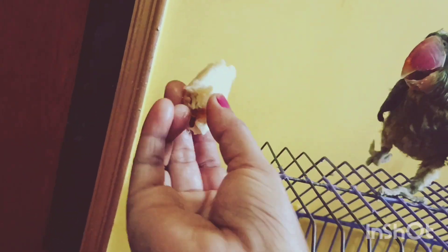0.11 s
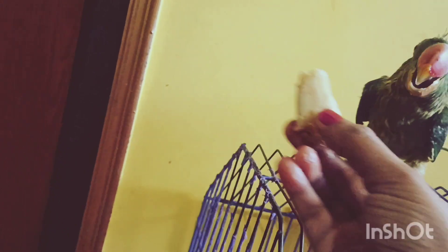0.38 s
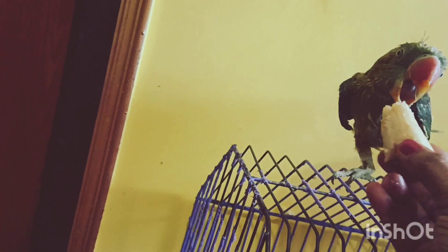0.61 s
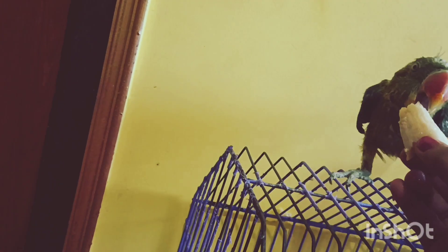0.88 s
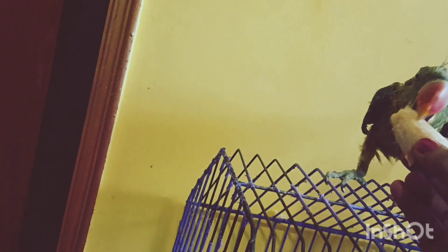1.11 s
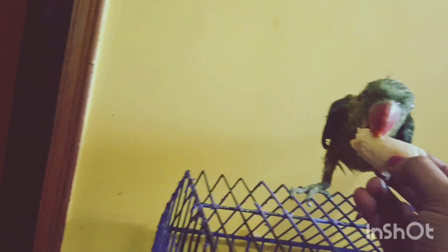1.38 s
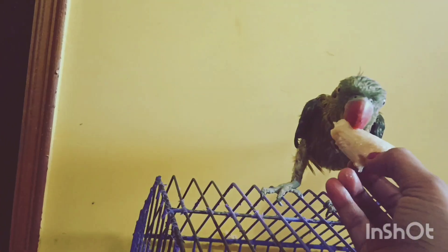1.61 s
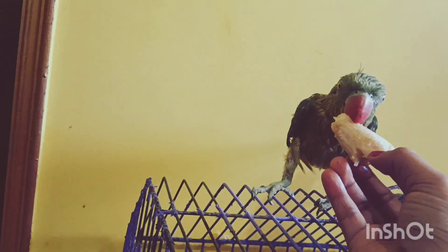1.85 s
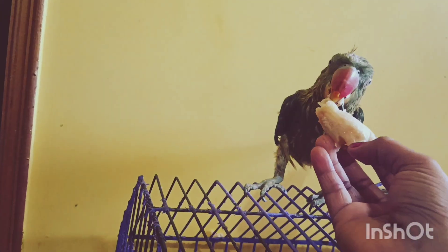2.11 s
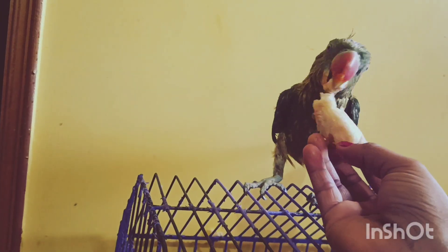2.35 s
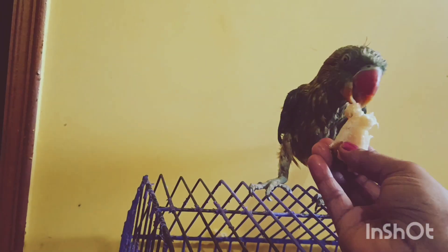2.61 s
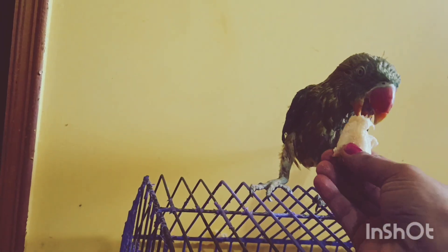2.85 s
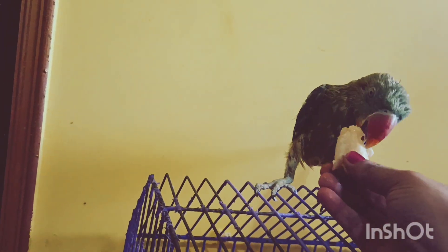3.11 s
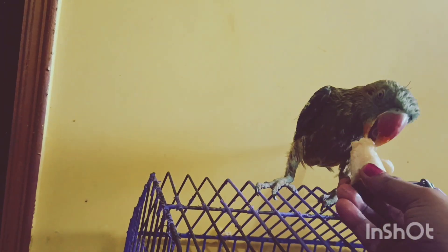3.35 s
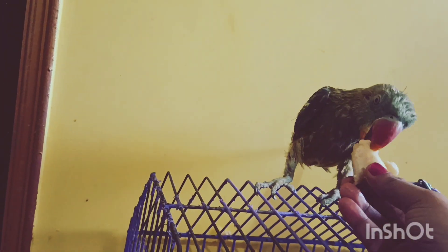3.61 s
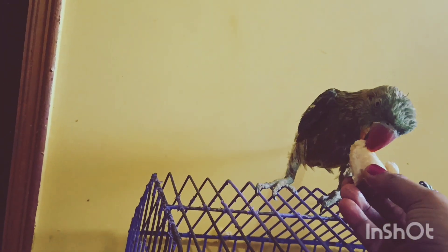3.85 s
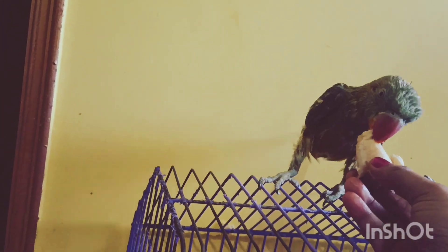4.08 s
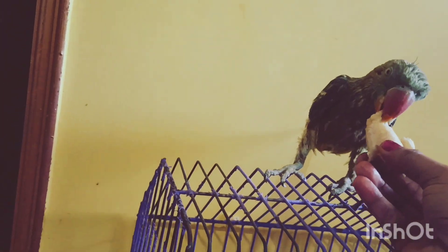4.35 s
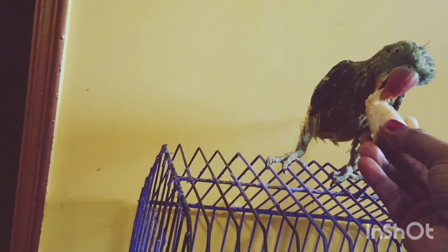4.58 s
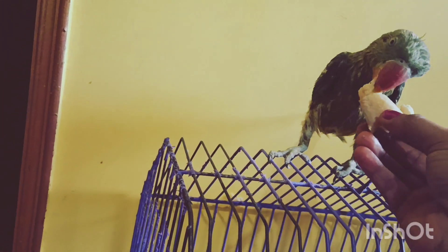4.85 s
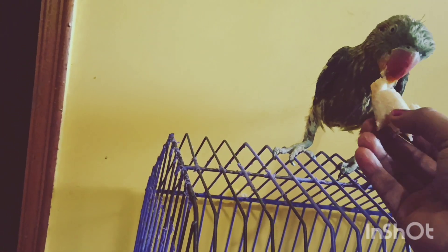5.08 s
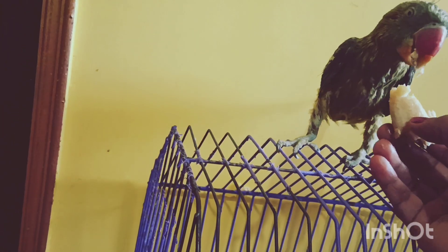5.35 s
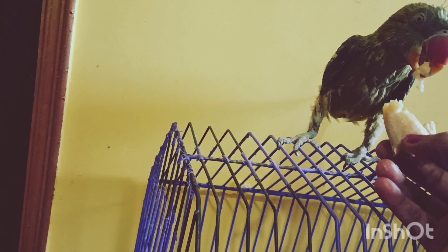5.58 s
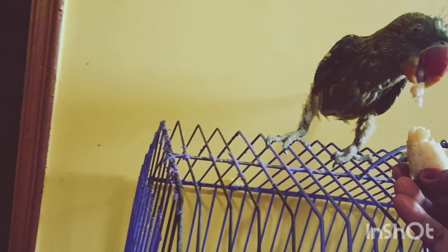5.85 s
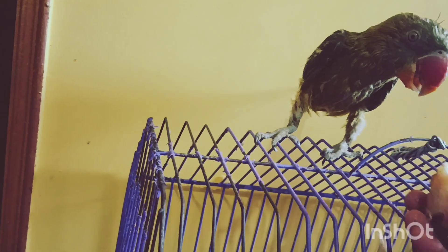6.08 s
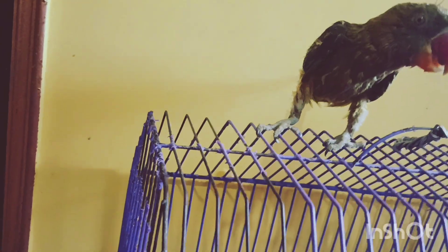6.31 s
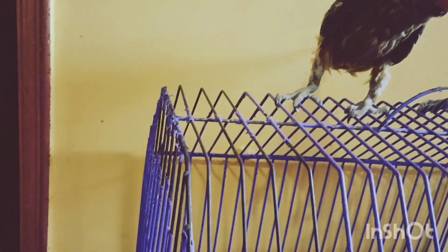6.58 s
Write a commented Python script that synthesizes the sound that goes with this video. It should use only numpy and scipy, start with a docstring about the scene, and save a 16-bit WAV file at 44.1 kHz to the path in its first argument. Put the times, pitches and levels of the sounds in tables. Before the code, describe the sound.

Close, piercing parrot screeches burst out in quick succession, with a brief falling rattle and two final shrieks, over quiet household murmur.

```python
"""Young parakeet, hard-walled room

A small room, the bird close to a phone with two microphones: one soft whistle, two runs of loud
screeches and a rattling squawk. The syrinx gives harmonics of a pitch that glides, jumps register and
trills; the throat colours them, and puffs of noise are the air. Echoes and a dense tail make the room.
The loud calls overload the microphone input; shaped noise and faint tones make the quiet household below."""
import sys
import numpy as np
from scipy import signal
from scipy.fft import rfft, irfft
from scipy.io import wavfile
from scipy.ndimage import uniform_filter1d

SR = 44100
rng = np.random.default_rng(int(sys.argv[2]) if len(sys.argv) > 2 else 0)


def decibels_to_gain(level_db):
    """Convert a level in decibels to a linear amplitude gain (20 dB per decade)."""
    exponent = np.asarray(level_db, float) / 20
    return 10 ** exponent


def int16_out(signal):
    """Quantize to a 16-bit WAV file."""
    q = np.round(np.clip(np.atleast_2d(signal).T, -1, 1) * 32767)
    wavfile.write(sys.argv[1], SR, q.astype(np.int16))


N = 295463

# household noise, part common to both microphones: t/s, level/dB
MURMUR = [(0, -61.5), (0.399, -63.5), (.9, -61), (3.45, -58.5), (3.85, -61.5), (4.049, -59.5), (4.6, -60),
          (4.8, -58.5), (5.6, -62), (6.27, -62)]
# its relative spectrum: f/Hz, level/dB
MURMUR_COLOUR = [(18, -48.5), (30, -12), (116, -1), (150, -6), (260, -2), (364, -7), (552, -5),
                 (1300, -11.5), (1440, -9.5), (1730, -12), (7830, -24), (11900, -36), (15000, -56)]
# faint tones from the house, before they waver: from t/s, to t/s, f/Hz, amplitude/dB
TONES = [(3.2, 6.1, 1475, -71), (3.35, 3.8, 975, -71), (1.92, 2.11, 650, -58), (3.5, 3.8, 3800, -73),
         (4.2, 4.45, 5050, -81), (6.08, 6.16, 480, -67), (6.08, 6.25, 1880, -73)]
# the soft whistle, before its flutter: t/s, pitch f/Hz, level/dB
WHISTLE = [(0, 2400, -43), (.03, 2340, -33.5), (.05, 2166, -51), (.075, 2207, -40.5), (.11, 2136, -40),
           (.175, 2119, -33.5), (.21, 2184, -41.5), (.23, 2405, -38.5), (.268, 2846, -58)]
# nearby wall and cage top: left lag/s, right lag/s, level/dB
ECHOES = [(.00042, 0.000096, -12), (.0011, .0014, -16.5), (.0029, 0.0027, -8), (.0074, 0.01, -12.5)]
# time for the room tail to fall 60 dB: f/Hz, time/s
ROOM_T60 = [(500, 0.32), (2100, 0.41), (5500, 0.37), (8500, 0.26), (12000, 0.046)]
# relative strength of the room tail: f/Hz, level/dB
ROOM_COLOUR = [(1000, 3), (2100, 0.5), (3300, -8), (5500, -4), (8500, 4), (12000, -1.5)]
# bird's direct sound at the two microphones: t/s, left minus right level/dB
SIDE_OF_BIRD = [(0, -6), (1, -4), (1.5, -7), (2.2, -0.5), (3.1, -0.5), (4.9, -5.5), (5.3, -2.5), (6.4, -2)]
# puffs of air just ahead of the calls: t/s, level at the crest/dB, length/s
PUFFS = [(0.956, -23.5, 0.026), (1.182, -17, 0.018), (1.448, -20, 0.02), (1.726, -20, 0.035),
         (2.111, -21.5, 0.012), (2.491, -27.5, 0.012), (2.792, -14.5, 0.019), (3.011, -20, 0.019),
         (4.874, -27, 0.011), (5.252, -22.5, 0.021), (6.288, -17.5, 0.035), (6.507, -14.5, 0.034)]
# relative spectrum of the puffs: f/Hz, level/dB
PUFF_COLOUR = [(400, -15), (900, -12.5), (2600, -2), (4000, -4), (7000, -12.5), (10500, -19.5),
               (13000, -47)]
# throat resonance in the screeches: f/Hz, gain/dB
THROAT = [(900, -11.5), (1500, -12), (2200, -5.5), (2900, 3.5), (3400, 6.5), (4000, 5.5), (4600, -5),
          (5300, -2.5), (6200, -6), (7200, -8), (9000, -5.5), (10500, -13.5), (12500, -13), (15000, -44.5)]
# harmonics of the screeches at the source, from the first up: level/dB
HARMONICS_DB = [3, 4, 0, 1, -4.5, -6, -11.5, -9, -7, -9, -12.5, -16]
# uneven vibration of the upper harmonics: from t/s, to t/s, cycles a group, depth (0-1)
UNEVEN = [(5.284, 5.326, 3, 1)]
# one list a screech, low register before any trill: t/s, pitch f/Hz
PITCH = [
    [(.976, 944), (.984, 1536), (.992, 2420), (1.01, 2537), (1.03, 2370), (1.063, 2193), (1.066, 2235),
     (1.098, 1287)],
    [(1.197, 941), (1.208, 2149), (1.225, 2502), (1.245, 2290), (1.27, 2220), (1.285, 2000), (1.3, 1754),
     (1.316, 1107)],
    [(1.464, 950), (1.478, 2326), (1.5, 2288), (1.53, 2115), (1.55, 1912), (1.575, 1705), (1.594, 1207)],
    [(1.743, 923), (1.755, 2209), (1.8, 1971), (1.825, 1742), (1.85, 1591), (1.869, 1153)],
    [(2.136, 1581), (2.168, 2368), (2.198, 2381), (2.239, 2064), (2.285, 1538), (2.295, 1442),
     (2.303, 1151)],
    [(2.511, 1380), (2.538, 2263), (2.552, 1991), (2.56, 2423), (2.604, 2235), (2.651, 1593), (2.676, 1129)],
    [(2.808, 1009), (2.825, 2723), (2.84, 2633), (2.858, 2360), (2.875, 2326), (2.905, 1141)],
    [(3.026, 885), (3.038, 2322), (3.05, 2411), (3.078, 2230), (3.095, 2001), (3.115, 1780), (3.139, 1286)],
    [(4.892, 1524), (4.9, 2515), (4.925, 2596), (4.94, 2258)],
    [(5.273, 1389), (5.285, 2359), (5.305, 2409), (5.328, 2247), (5.35, 2206), (5.38, 2003), (5.405, 1772),
     (5.427, 1346)],
    [(6.318, 1393), (6.327, 2465), (6.338, 2700), (6.36, 2600), (6.378, 2447), (6.391, 2483), (6.402, 2302),
     (6.422, 1415)],
    [(6.532, 1302), (6.542, 2768), (6.552, 2815), (6.586, 2331), (6.597, 2217), (6.612, 1687),
     (6.627, 1335)],
]
# one row a screech: effort at the start, 1/4, 1/2 and 3/4 through (four columns, level/dB),
# extra brightness/dB per octave, extra second harmonic/dB
EFFORT = [(-12.5, -10.5, -5, -6, -0.98, 1.1), (-13, -10.5, -7, -7, -0.33, .6), (-8.5, -9, -10, -8, 0, .6),
          (-7, -9, -4.5, -7.5, 0, 0.3), (-12.5, -1.5, -5.5, -4, 1.1, 3), (-17, -4.5, -4.5, -4.5, 3, 2.97),
          (-6.5, -7, -6, -7, 0.53, 4), (-10.5, -12.5, -8, -7.5, 0.34, 0.56),
          (-27.5, -18.5, -17, -10, -2, .6), (-15.5, -17, -16, -10.5, -1.6, 1.5),
          (-4, -3.5, -2.5, 0.5, 0, 3.9), (-4.5, -5.5, -2, -0.5, 0, 5)]
# flips up to the high register: from t/s, to t/s, pitch ratio, extra brightness/dB per octave
FLIPS = [(0.993, 1.065, 1.338, 1.5), (2.824, 2.857, 1.286, -4.5), (4.904, 4.945, 1.205, -1.5),
         (5.285, 5.328, 1.39, -2), (6.337, 6.391, 1.3, -2), (6.541, 6.586, 1.283, -3)]
# trills, the pitch dropping to a floor and back until the call ends:
# from t/s, period/s, first floor f/Hz, sinking of the floor/Hz per s, lateness of the dip/periods
TRILLS = [(2.192, .0232, 1850, 5246, .08), (2.56, .0229, 1366, 388.3, .02)]
# brightness of the tone at each pitch: pitch f/Hz, extra brightness/dB per octave
PITCH_BRIGHTNESS = [(1000, -3.5), (1500, 2), (1900, 2), (2300, -1.5), (2600, 1), (3300, -3)]
# the voice catches or surges for a moment: mid t/s, half-length/s, level change/dB
CATCHES = [(.991, 0.0075, -6), (1.039, 0.0091, -9.5), (1.273, 0.012, -5), (1.811, 0.012, -5.5),
           (2.151, 0.0034, -4), (2.222, .005, -7.5), (2.544, 0.0086, -7), (2.584, .004, -8),
           (2.824, 0.0039, -9), (2.876, 0.0048, -5), (3.078, .012, -5), (4.9, .006, -11.5),
           (5.286, .005, -7.5), (5.322, .008, 6), (5.34, .02, -4), (5.384, .008, 3.5), (5.395, .008, -4.5),
           (6.334, 0.0073, -9), (6.55, 0.011, -13)]
# narrowed throat in the rattle: f/Hz, gain/dB
RATTLE_THROAT = [(900, -18), (1500, -19.5), (2200, -11), (2800, 2.5), (3300, -3.5), (3900, 0.5),
                 (4800, -12), (6000, -6.5), (8000, -13), (10500, -23), (12500, -31), (15000, -59.5)]
# harmonics of the rattle at the source, from the first up: level/dB
RATTLE_HARMONICS_DB = [0, -1.5, -5, -3, -11.5, -4.5, -8, -2.5, -7.5, -7]
# relative spectrum of the rustle: f/Hz, level/dB
RUSTLE_COLOUR = [(300, -20), (600, -1.5), (1100, -3), (1500, -7.5), (2500, -16), (5000, -35)]


def at_hz(points, hz):
    """Read a table on a log-frequency axis."""
    hz_at, value = np.transpose(points)
    return np.interp(np.log(np.maximum(hz, 1)), np.log(hz_at), value)


def coloured(x, points):
    """Shape a spectrum by a table of dB; rms 1."""
    size = x.shape[-1]
    gain = decibels_to_gain(at_hz(points, np.fft.rfftfreq(size, 1 / SR)))
    y = irfft(rfft(x) * gain, size)
    return y / np.sqrt(np.mean(y ** 2))


def drift(rate_hz, size):
    """Random wander slower than rate_hz, spread 1."""
    lowpass = signal.butter(2, rate_hz, fs=SR)
    y = signal.lfilter(*lowpass, rng.standard_normal(size + 4000))[4000:]
    return y / y.std()


def gate(t, start, end, fade):
    """A gate with smooth ends."""
    return np.sin(np.pi / 2 * np.clip(np.minimum(t - start, end - t) / fade, 0, 1)) ** 2


def murmur():
    """Soft wavering household noise, partly alike at both microphones, and the faint tones."""
    t = np.arange(N) / SR
    s, level_db = np.transpose(MURMUR)
    mid, side = coloured(rng.standard_normal((2, N)), MURMUR_COLOUR)
    pair = mid + 0.68 * side * np.array([[1], [-1]])
    noise = pair * decibels_to_gain(np.interp(t, s, level_db) + 1.2 * drift(8, N))
    tones = np.zeros(N)
    for start, end, hz, db in TONES:
        tones += decibels_to_gain(db) * gate(t, start, end, 0.0047) * np.sin(2 * np.pi * hz * t)
    return noise + tones * decibels_to_gain(3.0 * drift(6, N))


def glide(t, s, hz):
    """A rounded curve through the points, level at every turn and never overshooting."""
    slope = np.diff(hz) / np.diff(s)
    before, after = np.r_[slope[0], slope], np.r_[slope, slope[-1]]
    tangent = np.where(before * after > 0, 2 * before * after / (before + after + 1e-9), 0)
    i = np.clip(np.searchsorted(s, t) - 1, 0, len(s) - 2)
    step = s[i + 1] - s[i]
    u = np.clip((t - s[i]) / step, 0, 1)
    bend = (1 - u) * (tangent[i] - slope[i]) - u * (tangent[i + 1] - slope[i])
    return hz[i] + step * u * (slope[i] + (1 - u) * bend)


def span(s):
    """Sample numbers from the first to the last time, with a short lead and tail."""
    return np.arange(max(round((s[0] - .001) * SR), 0), round((s[-1] + 0.0017) * SR))


def whistle():
    """Nearly a pure tone with a faint, fading octave, fluttering a little."""
    out = np.zeros(N)
    s, hz, points_db = np.transpose(WHISTLE)
    at = span(s)
    t = at / SR
    phase = 2 * np.pi * np.cumsum(glide(t, s, hz)) / SR
    tone = decibels_to_gain(np.interp(t, s, points_db)) * np.sin(phase)
    octave = decibels_to_gain(-60 - 95 * t) * np.sin(2 * phase)   # fades 95 dB per s
    flutter = decibels_to_gain(2.4 * drift(37, len(at)))
    out[at] = np.sqrt(2) * flutter * (tone + octave)
    return out


def room(x):
    """First echoes, then a dense tail: noise dying at its own rate in each band, another per microphone."""
    t = np.arange(round(.9 * SR)) / SR
    response = np.zeros((2, len(t)))
    for low in 300 * 2 ** np.arange(0, 5.6, .5):   # half-octave bands
        band = signal.butter(2, [low, low * np.sqrt(2)], "band", fs=SR, output="sos")
        noise = signal.sosfilt(band, rng.standard_normal((2, len(t))))
        fall_db = -60 * t / at_hz(ROOM_T60, low * 1.174)
        slow = decibels_to_gain(-29 + fall_db / 2.4)   # a livelier space beyond the door rings on faintly
        response += noise * decibels_to_gain(at_hz(ROOM_COLOUR, low * 1.32)) * (decibels_to_gain(fall_db) + slow)
    response *= np.clip((t - .004) / 0.0014, 0, 1)   # the tail enters after a short gap
    tail_db = -11   # whole tail against the dry bird
    response *= decibels_to_gain(tail_db) / np.sqrt((response ** 2).sum(axis=1, keepdims=True))
    for left, right, db in ECHOES:
        response[[0, 1], [round(left * SR), round(right * SR)]] += decibels_to_gain(db)
    return signal.fftconvolve(x[None], response)[:, :N]


def puffs():
    """Short bursts of turbulent air that swell and fade."""
    t = np.arange(N) / SR
    air = coloured(rng.standard_normal(N), PUFF_COLOUR)
    swell = sum(decibels_to_gain(db) * gate(t, s, s + length, 0.5 * length) for s, db, length in PUFFS)
    return air * swell


def syrinx(t, pitch_hz, level_db, bright_db, throat, even, harmonics_db, shimmer_db):
    """Harmonics of the pitch, each weighted by the throat where it lies, plus breath."""
    jitter, breath_db = .005, -23            # pitch spread (share); breath against the tone (dB)
    rough_db_per_oct_s, hoarsest_db = 0.13, 6   # extra breath for fast pitch change, and its limit
    pitch_hz = pitch_hz * (1 + jitter * drift(150, len(t)))
    phase = 2 * np.pi * np.cumsum(pitch_hz) / SR
    k = np.arange(1, len(harmonics_db) + 1)[:, None]
    colour_db = np.array(harmonics_db)[:, None] + at_hz(throat, k * pitch_hz) + bright_db * np.log2(k)
    weights = decibels_to_gain(colour_db) * (k * pitch_hz < 17000)
    shimmer = np.array([drift(90, len(t)) for _ in k])
    weights = weights * decibels_to_gain(shimmer_db * np.sqrt(k) * shimmer)
    power = (weights ** 2).sum(axis=0) / 2
    # even: hold the power steady; otherwise let crossings of the resonance flash
    weights = weights / np.sqrt(power if even else power.mean())
    for start, end, group, depth in UNEVEN:   # side tones grow round the upper harmonics
        weights[1:] *= 1 + 2 * depth * gate(t, start, end, 0.0025) * np.cos(phase / round(group))
    tone = (weights * np.sin(k * phase + k ** 2)).sum(axis=0)
    octaves_per_s = uniform_filter1d(np.abs(np.gradient(np.log2(pitch_hz))) * SR, size=400)
    hoarse_db = np.minimum(rough_db_per_oct_s * octaves_per_s, hoarsest_db)   # fast glides turn hoarse
    breath = decibels_to_gain(breath_db + hoarse_db) * coloured(rng.standard_normal(len(t)), throat)
    return (tone + breath) * decibels_to_gain(level_db) * gate(t, t[0], t[-1], 0.0011)


def trilled(t, s, pitch_hz):
    """The trill of a call: sharp repeated drops of the pitch to a sinking floor."""
    for start, period, floor_hz, sink, late in TRILLS:
        if s[0] < start < s[-1]:
            since = np.maximum(t - start, 0)
            turn = np.pi * (since / period - late * np.sin(np.pi * since / period) ** 2)
            drop_hz = np.maximum(pitch_hz - floor_hz + sink * since, 0)
            pitch_hz = pitch_hz - drop_hz * np.abs(np.sin(turn)) ** 2.4   # power sharpens the dip
    return pitch_hz


def calls():
    """The screeches: pitch sets part of the brightness and, through the throat, part of the level."""
    attack_db, attack_s, release_db, release_s = -4.5, 0.013, -11.5, 0.01
    resonance_share = .4   # share of the throat's larger gain at the two lowest harmonics
    out = np.zeros(N)
    for rows, (*effort_db, bright_db, second_db) in zip(PITCH, EFFORT):
        s, hz = np.transpose(rows)
        at = span(s)
        t = at / SR
        pitch_hz = trilled(t, s, glide(t, s, hz))
        for start, end, ratio, tilt_db in FLIPS:
            high = gate(t, start - .001, end + .001, .001)
            pitch_hz = pitch_hz * ratio ** high
            bright_db = bright_db + tilt_db * high
        bright_db = bright_db + at_hz(PITCH_BRIGHTNESS, pitch_hz)
        level_db = np.interp(t, np.linspace(t[0], t[-1], 5)[:-1], effort_db)
        for mid, half, db in CATCHES:
            level_db += db * gate(t, mid - half, mid + half, half)
        throat_db = np.maximum(at_hz(THROAT, pitch_hz), at_hz(THROAT, 2 * pitch_hz))
        level_db += resonance_share * throat_db
        level_db += attack_db * np.exp((t[0] - t) / attack_s)
        level_db += release_db * np.exp((t - t[-1]) / release_s)
        harmonics_db = np.array(HARMONICS_DB, float)
        harmonics_db[1] += second_db
        out[at] += syrinx(t, pitch_hz, level_db, bright_db, THROAT,
                          even=True, harmonics_db=harmonics_db, shimmer_db=2.0)
    return out


def rattle():
    """Pitch swings ever faster while sinking; harmonics flash across the narrowed throat's resonance."""
    start_s, end_s, first_top_s = 4.941, 5.128, 4.969
    swings_per_s, quicken_per_s2 = 72.5, 208   # swing rate at the first top, and its growth
    sink_s = .054                              # time constant of the sinking pitch
    out = np.zeros(N)
    at = np.arange(round(start_s * SR), round(end_s * SR))
    since = at / SR - first_top_s
    swing = np.cos(2 * np.pi * (swings_per_s + quicken_per_s2 * since / 2) * since)
    left = np.minimum(np.exp(-since / sink_s), 1)
    top_hz = 1340 + (2150 - 1340) * left
    bottom_hz = 910 + (1350 - 910) * left
    pitch_hz = bottom_hz + (top_hz - bottom_hz) * (1 + swing) / 2
    release_db = -11.5 * np.exp((at - at[-1]) / SR / .02)
    level_db = -11 - 32 * since + release_db + 2.5 * swing   # fades 32 dB per s
    out[at] = syrinx(at / SR, pitch_hz, level_db, 0, RATTLE_THROAT, even=False,
                     harmonics_db=RATTLE_HARMONICS_DB, shimmer_db=.9)
    return out


def rustle():
    """A short dull rustle nearby: low-weighted noise, separate at each microphone."""
    start_s, end_s, level_db = 5.6, 5.84, -49   # level before the fades
    noise = coloured(rng.standard_normal((2, N)), RUSTLE_COLOUR)
    return decibels_to_gain(level_db) * noise * gate(np.arange(N) / SR, start_s, end_s, 0.14)


def scene():
    """Bird, its room and the house at the two microphones."""
    bird = whistle() + puffs() + calls() + rattle()
    pan_db = np.interp(np.arange(N) / SR, *np.transpose(SIDE_OF_BIRD))
    direct = bird * decibels_to_gain(pan_db * np.array([[.5], [-.5]]))
    return direct + room(bird) + murmur() + rustle()


def turn_down_lows(x):
    """The lows are turned down shortly after the treble grows loud."""
    below_hz, from_db, change_db, lag_s = 1050, -33, -18, .04
    lows = irfft(rfft(x) / (1 + (np.fft.rfftfreq(N, 1 / SR) / below_hz) ** 12), N)
    treble_power = uniform_filter1d(np.mean((x - lows) ** 2, axis=0), size=900)
    treble_db = 10 * np.log10(treble_power + 1e-12)
    depth = np.clip((treble_db - from_db) / 8, 0, 1)   # full depth 8 dB above the threshold
    keep = np.exp(-1 / (lag_s * SR))
    depth = signal.lfilter([1 - keep], [1, -keep], depth)
    return x - lows * (1 - decibels_to_gain(change_db * depth))


def top_cut(x):
    """Nothing passes above the cut-off."""
    return signal.sosfilt(signal.butter(12, 15350, fs=SR, output="sos"), x)


def record(dry):
    """The input clips flat and a little lopsided, which adds a low thump under the loudest calls."""
    drive_db, lopsided = 1.5, 0.03
    x = np.clip(turn_down_lows(dry) * decibels_to_gain(drive_db), -1, 1)
    x = np.clip(x + lopsided * x ** 6, -1, 1)
    return top_cut(x)


dry = scene()
out = record(dry)
int16_out(out)
```